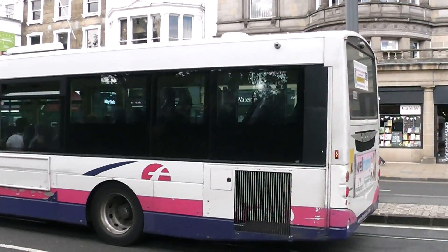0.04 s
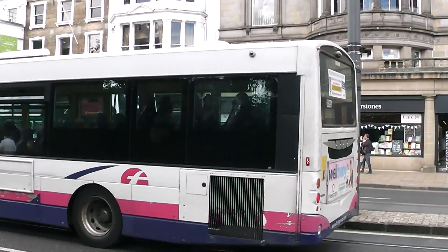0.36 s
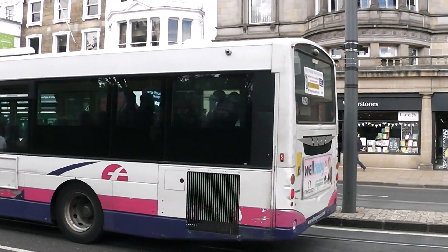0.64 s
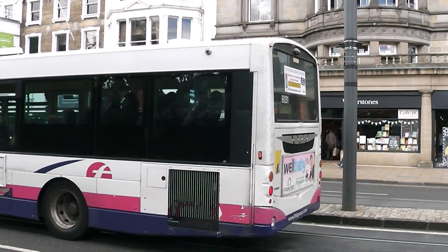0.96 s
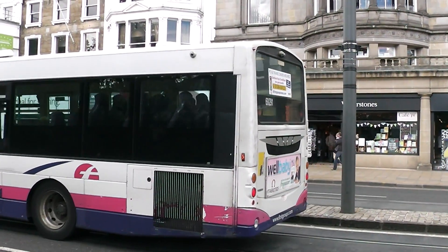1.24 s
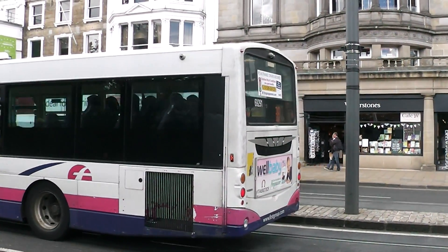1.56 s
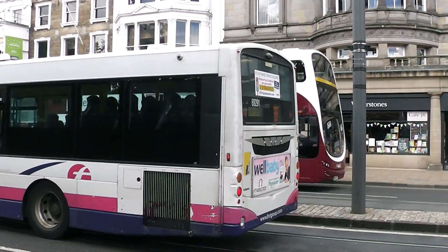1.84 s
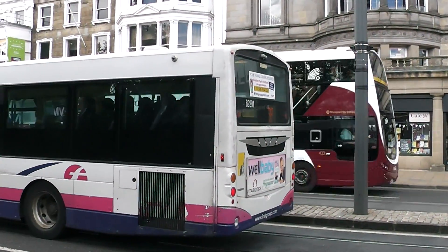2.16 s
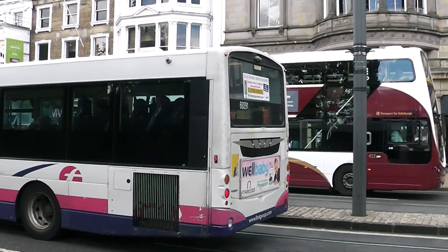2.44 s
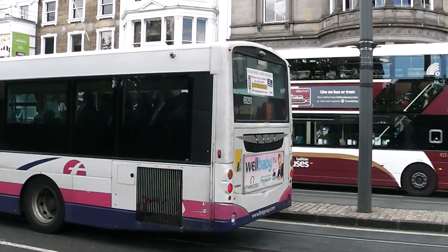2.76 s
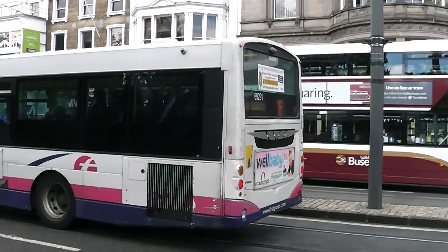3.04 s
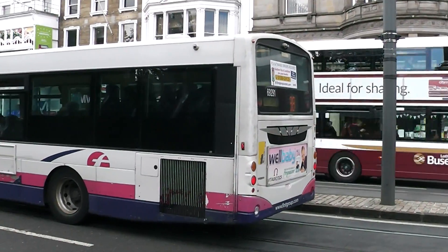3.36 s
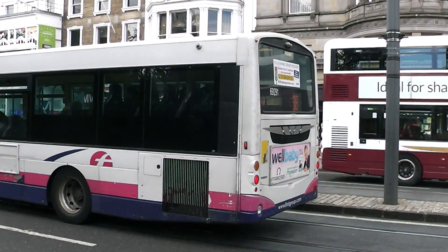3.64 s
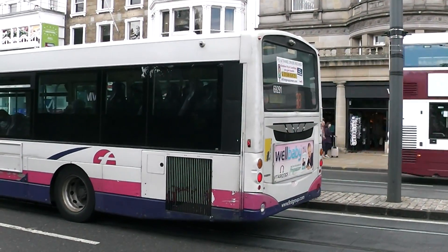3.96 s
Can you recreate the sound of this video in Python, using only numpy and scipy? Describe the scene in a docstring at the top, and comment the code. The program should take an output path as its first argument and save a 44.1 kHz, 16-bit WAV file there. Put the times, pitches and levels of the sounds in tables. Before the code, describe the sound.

High, wavering brake squeal as a city bus stops, its diesel engine rumbling underneath.

```python
"""A bus brake squeals near 8 kHz: friction keeps its modes ringing, and the tone hops between two
neighbours while others chirp. Road and house fronts throw the squeal back. Underneath, the diesel
booms and a drive drone dies away as the city bus creeps to a halt a few metres off. At the stop a valve
puffs air and the brake gear clinks. Engine and traffic roar, tyre hiss and low rumble form the bed."""
import sys
import numpy as np
from scipy import signal
from scipy.fft import rfft, irfft
from scipy.io import wavfile

SR = 44100
rng = np.random.default_rng(int(sys.argv[2]) if len(sys.argv) > 2 else 0)


def master_out(mix):
    """Clip the mix to full scale and print it as 16-bit PCM to the path in sys.argv[1]."""
    frames = np.transpose(np.atleast_2d(mix))
    ceiling = np.clip(frames, -1, 1)
    pcm = np.round(ceiling * 32767).astype(np.int16)
    wavfile.write(sys.argv[1], SR, pcm)


N = 176400
T = np.arange(N) / SR
HZ = np.fft.rfftfreq(N, 1 / SR)

# Table levels are relative: trims and modulation act on top of them.
# main brake mode, pitch line (t/s, f/Hz)
SQUEAL_PITCH = [(.5, 8095), (.6, 8045), (.67, 8030), (.73, 7990), (.8, 8030), (.9, 8060), (.98, 8110),
                (1.13, 8120), (1.18, 8020), (1.3, 8000), (1.55, 8003), (1.7, 8030), (1.78, 8075),
                (1.82, 8285), (2.22, 8278), (2.24, 8090), (2.3, 8042), (2.4, 8048), (2.62, 8145)]
# its envelope (t/s, level/dB)
SQUEAL_LEVEL = [(.49, -58), (.51, -31), (.6, -20), (.8, -19), (.89, -24), (.96, -35), (1.1, -41),
                (1.19, -18.5), (1.29, -27), (1.38, -20), (1.47, -20), (1.53, -28), (1.6, -25), (1.68, -27),
                (1.75, -30.5), (1.795, -18.5), (1.81, -27), (1.85, -17.5), (1.97, -16.5), (2.03, -23),
                (2.075, -19.5), (2.17, -19.5), (2.2, -25), (2.25, -41), (2.305, -17.5), (2.42, -20),
                (2.52, -27.5), (2.6, -37), (2.63, -63)]
# dips where it falters (t/s, level/dB)
SQUEAL_DIPS = [(.53, -6), (.745, -6), (1.27, -6), (1.355, -8), (1.52, -7), (1.58, -13), (1.638, -12),
               (1.672, -10), (1.72, -11), (1.75, -9), (1.78, -13), (2.055, -10), (2.142, -14), (2.183, -10),
               (2.212, -10), (2.5, -11)]
# neighbouring mode just below, pitch line (t/s, f/Hz)
NEIGHBOUR_PITCH = [(.72, 7750), (.93, 7820), (1.12, 7870), (1.9, 7912), (2.18, 7895), (2.32, 7835)]
# its envelope (t/s, level/dB)
NEIGHBOUR_LEVEL = [(.55, -60), (.68, -42), (.75, -34), (.86, -50), (.93, -29), (1.0, -29.5), (1.08, -24),
                   (1.14, -37), (1.25, -70), (1.85, -64.5), (1.97, -34), (2.05, -46), (2.18, -48),
                   (2.27, -30), (2.33, -36), (2.42, -66)]
# one swell of a lower mode (t/s, f/Hz, level/dB)
LOW_SQUEAL = [(1.24, 5850, -90), (1.28, 5845, -48), (1.32, 5790, -41), (1.345, 5732, -32),
              (1.375, 5732, -33.5), (1.403, 5738, -43), (1.435, 5748, -36.5), (1.49, 5770, -47),
              (1.6, 5770, -50), (1.7, 5770, -90)]
# squeaks of other modes (start/s, length/s, f/Hz, glide/Hz, level/dB, roughness/0-1)
CHIRPS = [(.485, .04, 7265, -30, -35, .1), (1.075, .075, 7255, -25, -28, .05),
          (1.13, .12, 7245, 0, -45, .1), (1.14, .05, 4560, 100, -43.5, .5),
          (1.78, .12, 4630, 80, -41.5, .3), (1.915, .055, 4670, 30, -45.5, .35),
          (2.02, .22, 7300, 0, -49, .2), (2.63, .22, 7320, 50, -44, .15), (2.75, .19, 5800, 0, -43, 0),
          (2.87, .045, 7680, -30, -34, .1), (2.879, .013, 5730, 0, -32, .3),
          (2.97, .035, 4620, -40, -41, .2), (3.38, .12, 5280, -130, -48, .5),
          (3.6, .12, 4990, -70, -48, .4)]
# faint singing of the rubbing pads (f/Hz, start/s, end/s, level/dB, roughness/0-1)
PAD_SINGING = [(4190, .05, .55, -48, .1), (4185, .55, 1.9, -53, .15), (4225, 2.0, 2.8, -54, .4),
               (5030, 1.0, 2.25, -59, .25), (5055, 2.2, 2.78, -51, .2)]
# slaps off road and house fronts (left delay/s, right delay/s, level/dB)
ECHOES = [(.0031, 0.0036, -19.5), (0.0111, .0119, -11), (0.026, .0255, -29)]
# diesel boom (t/s, firing-rate level/dB, octave level/dB)
BOOM = [(0, -21, -27.5), (.3, -21, -24), (.55, -26, -29.5), (.75, -20, -29), (1.1, -27.5, -31),
        (1.33, -26, -22.5), (1.5, -22, -30), (1.73, -24, -22), (1.95, -24, -34), (2.14, -21, -23.5),
        (2.45, -26, -33), (2.72, -19.5, -31.5), (3.0, -22, -28), (3.16, -17, -35), (3.3, -33, -29.5),
        (3.43, -20.5, -22), (3.68, -26, -20.5), (3.8, -28, -28.5), (4, -29, -23.5)]
# higher diesel orders (multiple of the firing rate, rolling level/dB, resting level/dB)
ORDERS = [(3.097, -40.5, -35.5), (4.283, -38.5, -38.5), (4.99, -34.5, -41.5), (6.375, -34.5, -32.5),
          (6.976, -36.5, -37.5), (8.01, -34, -45), (10.08, -63, -36.5), (13.67, -34.5, -50),
          (27.33, -39.5, -38.5), (46.17, -39, -41.5)]
# colour of the escaping air (f/Hz, level/dB)
PUFF_SPECTRUM = [(500, -20), (1200, -7), (1500, 0), (1700, 4), (1900, 9), (2200, 1), (2600, -24),
                 (4000, -12), (7000, -21), (9700, -10.5), (12000, -43), (15500, -40)]
# hits of the settling brake gear (t/s, level/dB)
CLINKS = [(2.936, -24), (2.951, -26.5), (2.972, -29)]
# its ringing modes (f/Hz, level/dB, t60/s)
CLINK_MODES = [(1527, 1, 0.09), (1820, 2, .08), (1950, 2.5, 0.11), (2165, 2, 0.12), (4000, -3, .09),
               (4560, -15, 0.091), (8850, -11, .04), (9650, -3, 0.048)]
# colour of the engine and traffic roar, before its band-pass (f/Hz, level/dB)
ROAR_SPECTRUM = [(59, -38), (100, -2), (156, -4), (188, -5.5), (209, -3), (228, -3.5), (313, -8), (386, -8),
                 (467, -4.5), (742, -9), (936, -10), (1090, -13), (1180, -10.5), (1660, -16), (2090, -19.5),
                 (2470, -27.5), (3320, -30), (4100, -22), (6120, -30), (9340, -33), (15500, -52)]
# colour of the tyre and pad hiss (f/Hz, level/dB)
HISS_SPECTRUM = [(2000, -7.5), (3200, -14.5), (4200, -0.5), (4800, -2), (6200, -3.5), (7500, -2.5),
                 (9500, -3), (12000, -12.5), (15500, -17.5)]
# envelopes of the bed (t/s, roar level/dB, hiss level/dB)
BED_LEVELS = [(0.02, -20.5, -41.5), (0.06, -22, -42.5), (1.78, -21.5, -44.5), (1.93, -25, -48),
              (1.96, -27.5, -50), (2.15, -21, -43), (2.32, -23, -45.5), (2.62, -21, -43.5),
              (2.91, -22.5, -43.5), (2.94, -18.5, -40), (2.96, -21, -43.5), (3.5, -22.5, -44.5),
              (3.97, -20.5, -43.5), (3.98, -20.5, -44.5)]
# colour of the low rumble (f/Hz, level/dB)
RUMBLE_SPECTRUM = [(10, -21), (22, -5.5), (33, 3), (50, -3.5), (88, -2.5), (125, -12), (200, -17.5),
                   (300, -23), (600, -65)]
# its envelope (t/s, level/dB)
RUMBLE_LEVEL = [(0, -26.5), (.18, -26), (.5, -27.5), (.78, -29), (.88, -22.5), (1.1, -27), (1.33, -21.5),
                (1.47, -22.5), (1.72, -19), (1.8, -22), (1.88, -23), (2.02, -26), (2.15, -22), (2.3, -25),
                (2.65, -27.5), (2.95, -22), (3.3, -29.5), (3.42, -24.5), (3.7, -25), (4, -30.5)]
# how alike left and right are in the bed (f/Hz, correlation/0-1)
CORRELATION = [(60, 0.91), (125, 1), (250, 0.98), (500, 0.99), (1000, 0.97), (2000, 0.84), (3800, 0.89),
               (7500, 0.99), (10000, 1), (13000, 0.064)]
# pan of the noise layers (f/Hz, left minus right/dB)
PAN = [(60, 2.5), (150, 2.5), (400, 3.1), (1000, 3), (2400, 2), (6000, 0.3), (15000, -1)]

JITTER_HZ, FLUTTER_DB, THROB_DB = 6, .8, 1.1  # unsteadiness of the brake tones
SCRAPE_HZ, SCRAPE_DB = 45, 2.5  # extra jitter and flutter at full roughness
STREET_T60, STREET_TAIL_DB = .61, -13
FIRING_HZ, FIRING_WANDER, BLUR_RAD = 35.2, .014, .035
SLOWING_S, STOPPED_S = .58, 2.34
PUFF_S, PUFF_RISE_S, PUFF_T60, PUFF_DB = 2.934, .005, .25, -19
DRONE_HZ, DRONE_HALF_WIDTH_HZ, DRONE_DB = 478, 38, -30.5


def brake_squeal():
    """Two neighbouring brake modes take turns and throb; a lower one swells once."""
    dips_db = sum(db * np.exp(-((T - at) / .006) ** 2) for at, db in SQUEAL_DIPS)
    out = brake_mode(curve(SQUEAL_PITCH)) * amp(curve(SQUEAL_LEVEL) + dips_db)
    out += brake_mode(curve(NEIGHBOUR_PITCH)) * amp(curve(NEIGHBOUR_LEVEL))
    gate = (T > SQUEAL_LEVEL[0][0]) * (T < SQUEAL_LEVEL[-1][0])
    out *= amp(THROB_DB * drift(rate_hz=26)) * gate
    low_db = curve(LOW_SQUEAL, column=2)
    low = brake_mode(curve(LOW_SQUEAL), rough=.13, octave_db=low_db + 26)  # brighter when louder
    return out + low * amp(low_db + .5)


def brake_mode(hz, rough=0, octave_db=-33):
    """Friction keeps a mode ringing: a jittering tone and its octave. A loose grip roughens it."""
    jitter = (JITTER_HZ + rough * SCRAPE_HZ) * drift(rate_hz=90)
    flutter = amp((FLUTTER_DB + rough * SCRAPE_DB) * drift(rate_hz=130))
    phase = 2 * np.pi * np.cumsum(hz + jitter) / SR
    return np.sqrt(2) * (np.sin(phase) + amp(octave_db) * np.sin(2 * phase)) * flutter


def brake_chirps():
    """Other brake modes squeak briefly, most with a small pitch bend."""
    out = np.zeros(N)
    for start, length, hz, glide, db, rough in CHIRPS:
        progress = np.clip((T - start) / length, 0, 1)
        out += brake_mode(hz + glide * progress, rough) * amp(db + 1) * np.sin(np.pi * progress)
    return out


def pad_singing():
    """The rubbing pads hold faint tones under the squeal."""
    out = np.zeros(N)
    for hz, start, end, db, rough in PAD_SINGING:
        fade = np.clip(np.minimum(T - start, end - T) / .028, 0, 1)
        out += brake_mode(hz, rough) * amp(db + THROB_DB * drift(rate_hz=20)) * fade
    return out


def street(source):
    """Road and house fronts add a few slaps and a short diffuse tail."""
    t = T[:SR]
    response = rng.standard_normal((2, SR)) * amp(-60 * t / STREET_T60) * (t > .008)
    response *= amp(STREET_TAIL_DB) / np.linalg.norm(response[0])
    response[:, 0] = 1  # direct sound
    for left, right, db in ECHOES:
        response[[0, 1], [round(left * SR), round(right * SR)]] += amp(db)
    return signal.fftconvolve(source[None], response, axes=1)[:, :N]


def diesel(firings):
    """The two lowest orders boom; higher ones blur and shift their balance as the bus slows."""
    at_rest = np.interp(T, [SLOWING_S, STOPPED_S], [0, 1])
    levels = [(1, curve(BOOM) - 2), (2, curve(BOOM, column=2) - .5)]
    for order, rolling, resting in ORDERS:
        levels.append((order, rolling + (resting - rolling) * at_rest + 2.7 * drift(rate_hz=3.5)))
    out = np.zeros(N)
    for order, db in levels:
        waver = .95 * drift(rate_hz=6.2) + BLUR_RAD * order * drift(rate_hz=23.7)
        out += np.sqrt(2) * amp(db) * np.sin(2 * np.pi * order * firings + waver)
    return out * amp([[1.4], [-2]])  # left of centre


def drive_drone():
    """A broad resonance of the drive dies away as the bus slows."""
    peak_db = -20 * np.log10(1 + ((HZ - DRONE_HZ) / DRONE_HALF_WIDTH_HZ) ** 2)
    fade_db = 6.5 * (T / 1.4) ** 2
    return noise(peak_db, per_bin(CORRELATION)) * amp(DRONE_DB - fade_db)


def air_valve():
    """A puff of compressed air: sharp attack, quick decay."""
    t = np.maximum(T - PUFF_S, 0)
    envelope = np.minimum(t / PUFF_RISE_S, 1) * amp(PUFF_DB - 60 * t / PUFF_T60)
    return noise(per_bin(PUFF_SPECTRUM), correlation=.46) * envelope


def gear_clinks():
    """The brake gear settles with a metallic rattle, each hit ringing its modes in a new mix."""
    out, t = np.zeros(N), T[:SR // 4]
    for start, hit_db in CLINKS:
        for hz, mode_db, t60 in CLINK_MODES:
            envelope = amp(hit_db + mode_db - 60 * t / t60) * rng.uniform(.41, 1)
            ring = np.sin(2 * np.pi * (hz * t + rng.random()))
            out[round(start * SR):][:len(t)] += envelope * ring
    return out * amp([[1], [-1]])


def traffic_bed(firings):
    """Engine and traffic roar, roughened by each firing, with tyre and pad hiss and a low rumble."""
    correlation = per_bin(CORRELATION)
    knock = 1 + .1 * np.cos(2 * np.pi * firings)
    band_db = -10 * np.log10((1 + (110 / (HZ + 1)) ** 4) * (1 + (HZ / 2880) ** 6))  # 110-2880 Hz
    roar = noise(per_bin(ROAR_SPECTRUM) + band_db, correlation) * knock
    roar *= amp(curve(BED_LEVELS) + 1.5 + .5 * drift(rate_hz=11))
    hiss = noise(per_bin(HISS_SPECTRUM), correlation * .65)
    hiss *= amp(curve(BED_LEVELS, column=2) + 7.5 + .5 * drift(rate_hz=28))
    rumble = noise(per_bin(RUMBLE_SPECTRUM), correlation=.4) * amp(curve(RUMBLE_LEVEL) + 2)
    return roar + hiss + rumble


def noise(spectrum_db, correlation):
    """Coloured stereo noise of rms 1, leaning left below the top treble."""
    left, independent = rfft(rng.standard_normal((2, N)))
    right = correlation * left + np.sqrt(1 - correlation ** 2) * independent
    pan_db = per_bin(PAN) / 2
    panned = np.array([left * amp(pan_db), right * amp(-pan_db)])
    return unit(irfft(panned * amp(spectrum_db), N))


def drift(rate_hz):
    """Smooth random modulation of rms about 1, rolling off above rate_hz."""
    times = np.linspace(0, T[-1], N // 49)
    hz = HZ[:len(times) // 2 + 1]
    spectrum = rfft(rng.standard_normal(len(times))) / (1 + (hz / rate_hz) ** 4) * (hz > 0)
    return np.interp(T, times, unit(irfft(spectrum, len(times))))


def curve(rows, column=1):
    """One column of a time table, at every sample."""
    rows = np.array(rows)
    return np.interp(T, rows[:, 0], rows[:, column])


def per_bin(rows):
    """A frequency table, at every bin."""
    hz, value = np.transpose(rows)
    return np.interp(np.log(HZ + 1), np.log(hz + 1), value)


def amp(db):
    """Decibels to gain."""
    return 10 ** (np.asarray(db) / 20)


def unit(x):
    """Scales to rms 1."""
    return x / np.sqrt(np.mean(x ** 2) + 1e-20)


def scene():
    """The mix: brake in the street, diesel and drive, puff and clinks, traffic bed."""
    firings = np.cumsum(FIRING_HZ * (1 + FIRING_WANDER * drift(rate_hz=1.499))) / SR
    brake = street(brake_squeal() + brake_chirps() + pad_singing())
    brake *= amp(drift(rate_hz=20) * np.array([[.4], [-.4]]))  # slight left-right sway
    return brake + diesel(firings) + drive_drone() + traffic_bed(firings) + air_valve() + gear_clinks()


def record(dry):
    """A steep low-pass trims the very top of the mix."""
    lowpass = signal.firwin(511, 15750, window=("kaiser", 9), fs=SR)
    return signal.oaconvolve(dry, lowpass[None], "same")


dry = scene()
out = record(dry)
master_out(out)
```